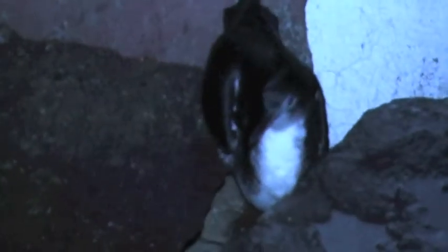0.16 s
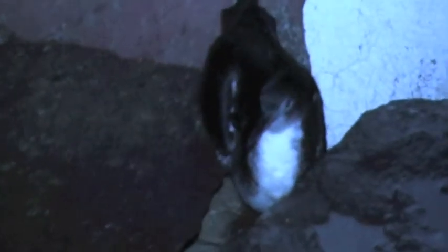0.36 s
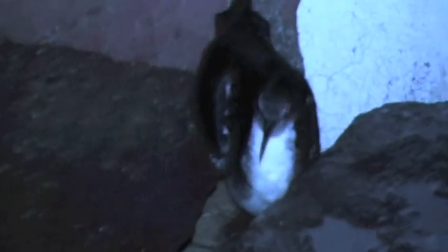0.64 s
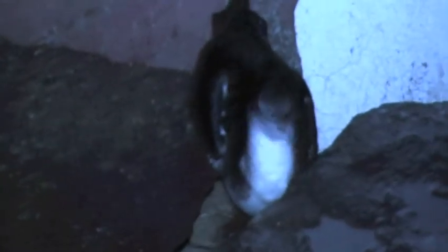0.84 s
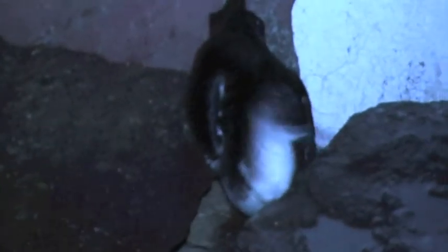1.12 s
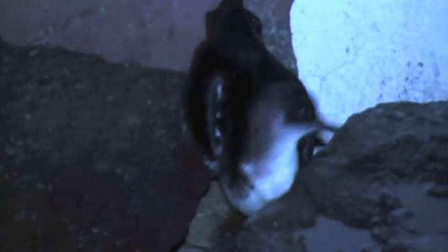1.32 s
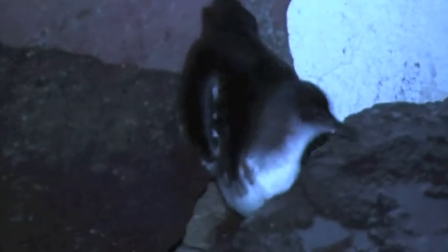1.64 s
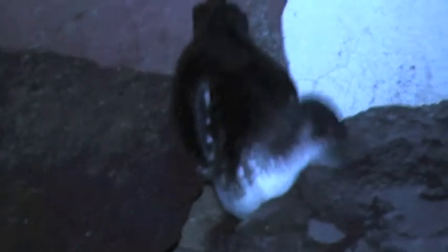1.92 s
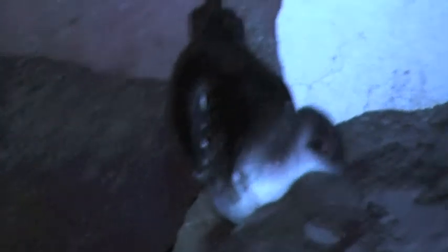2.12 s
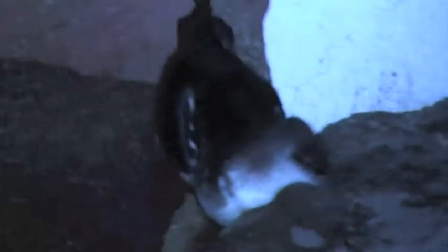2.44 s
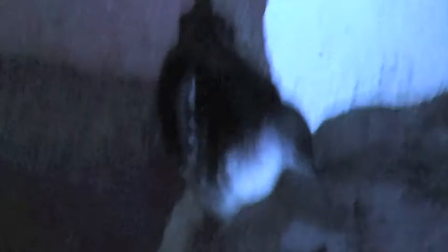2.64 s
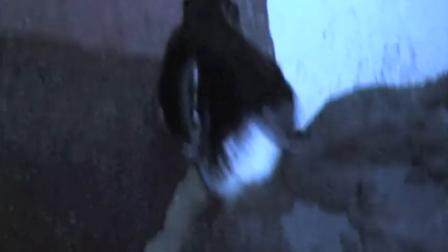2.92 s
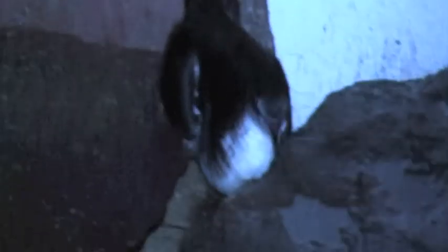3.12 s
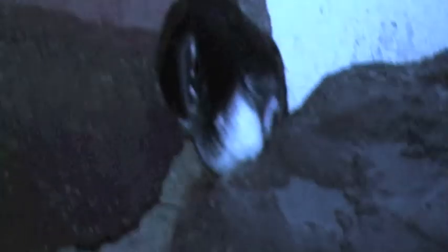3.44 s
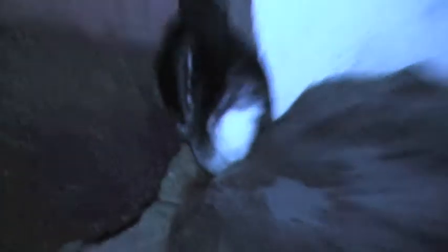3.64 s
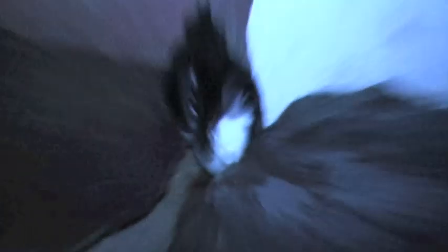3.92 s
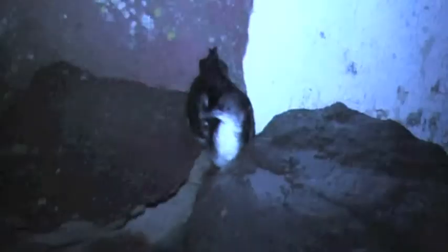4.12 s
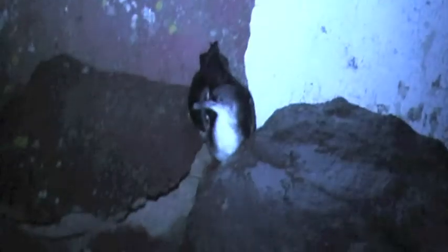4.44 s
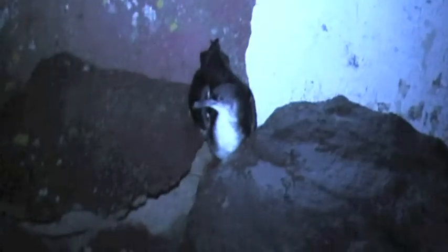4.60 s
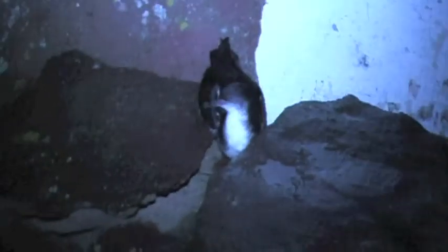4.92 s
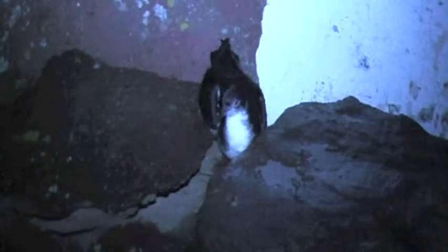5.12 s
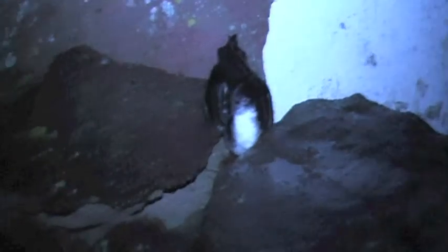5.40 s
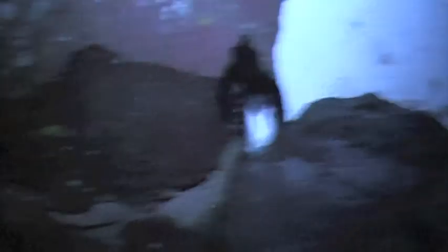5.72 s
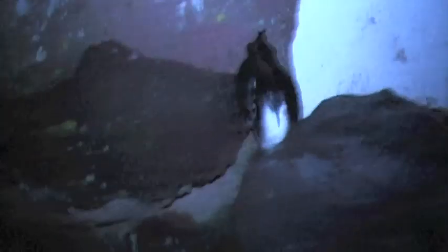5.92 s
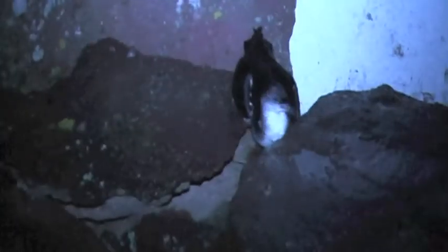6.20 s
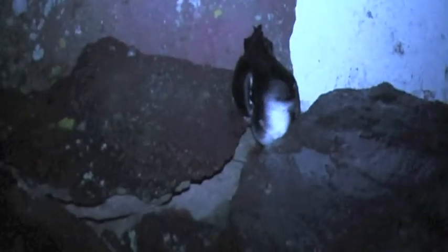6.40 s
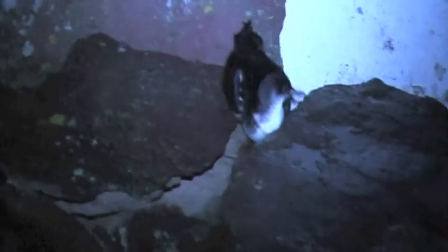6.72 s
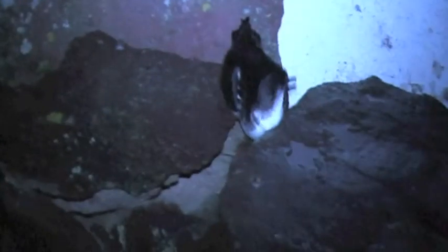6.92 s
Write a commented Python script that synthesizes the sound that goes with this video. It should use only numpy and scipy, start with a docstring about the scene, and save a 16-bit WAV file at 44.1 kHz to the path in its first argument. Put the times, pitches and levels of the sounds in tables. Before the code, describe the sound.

From a small rocky shelter at the edge of a nighttime colony, a crowd of far seabirds wails continuously, dotted with short whistles and yelps. One closer bird opens with three harsh rasps and a moan. Two hollow knocks follow near the microphone, then a sharp snap on the right, the loudest sound. More knocks, small ticks and faint rubbing come while the birds carry on.

```python
"""Hundreds of distant shearwaters wail together at night, heard from a rock shelter at the colony's edge.
A nearer bird rasps three times, ragged pulses ringing its throat, and trails off in a hoarse moan.
Single wails and thin peeps arch above the crowd; each voice is a membrane whose pitch jitters.
Close by come a few knocks and ticks, soft rubbing as of a handled camera, and one sharp snap,
the loudest sound: a catch strikes home and the casing rings."""
import sys
import numpy as np
from scipy import signal
from scipy.fft import rfft, irfft, next_fast_len
from scipy.io import wavfile

SR = 44100
rng = np.random.default_rng(int(sys.argv[2]) if len(sys.argv) > 2 else 0)


def transcribe(u):
    """Save the signal u as a 16-bit wav file named by the first command-line argument.

    u: samples, shape (n,) or (channels, n), limited to [-1, 1]; the rate is SR.
    q: integer samples, one column per channel.
    """
    v = np.clip(np.atleast_2d(u).T, -1, 1)
    q = np.round(v * 32767).astype(np.int16)
    wavfile.write(sys.argv[1], SR, q)


N = 311331

# rock shelter reverberation: freq_hz, t60_s
SHELTER_DECAY = [(200, 0.3), (2500, 0.077), (5000, 0.1), (12000, 0.016)]


def amp(db):
    """Decibels to gain."""
    return 10 ** (np.asarray(db) / 20)


def unit(x):
    """x at rms 1."""
    return x / np.sqrt(np.mean(x ** 2) + 1e-20)


def along(points, hz):
    """(freq_hz, value) points read on a log axis."""
    freqs_hz, values = np.transpose(points)
    return np.interp(np.log(hz + 1), np.log(freqs_hz), values)


def wobble(rate_hz, size=N):
    """Random curve with rate_hz knots a second."""
    knots = rng.standard_normal(int(size * rate_hz / SR) + 2)
    return np.interp(np.arange(size) * rate_hz / SR, np.arange(len(knots)), knots)


def gate(start_s, end_s, attack_s, release_s):
    """Exponential rise, hold from start_s to end_s, exponential decay."""
    t = np.arange(N) / SR
    return np.exp(-np.maximum(start_s - t, 0) / attack_s - np.maximum(t - end_s, 0) / release_s)


def elapsed(start_s, end_s):
    """Seconds since start_s, held from end_s."""
    return np.clip(np.arange(N) / SR, start_s, end_s) - start_s


def add(track, start_s, sound):
    """Mix a sound into a track."""
    start = max(round(start_s * SR), 0)
    part = track[..., start:start + sound.shape[-1]]
    part += sound[..., :part.shape[-1]]


def filtered(x, response):
    """x through a frequency response."""
    size = x.shape[-1]
    padded = next_fast_len(size + 4096, True)
    return irfft(rfft(x, padded) * response(np.fft.rfftfreq(padded, 1 / SR)), padded)[..., :size]


def coloured(x, spectrum):
    """x with a (freq_hz, gain_db) colour, at rms 1."""
    return unit(filtered(x, lambda hz: amp(along(spectrum, hz))))


def resonance(hz, centre_hz, width_hz):
    """Causal response of one resonance."""
    return 1j * hz * width_hz / (centre_hz ** 2 - hz ** 2 + 1j * hz * width_hz)


def band(x, centre_hz, width_hz):
    """x twice through one resonance, at rms 1."""
    return unit(filtered(x, lambda hz: resonance(hz, centre_hz, width_hz) ** 2))


def hump(hz, centre_hz, octaves):
    """Broad rounded peak with straight skirts."""
    return amp(-16 * np.hypot(np.log2((hz + 60) / centre_hz) / octaves, .6))


def spread(pair):
    """Two unrelated signals as mid and side of a wide field."""
    # stereo width: freq_hz, side_gain_db
    width = [(60, -1), (110, -5), (200, -0.5), (380, -5), (700, -9), (1290, -1.5), (2380, -4.5), (4400, -6),
             (8120, -0.5), (15000, -9)]
    side = filtered(pair[1], lambda hz: amp(along(width, hz)))
    return np.array([pair[0] + side, pair[0] - side])


def echoes(x):
    """The shelter's diffuse stereo tail; each frequency dies at its own rate."""
    hz, t, noise = signal.stft(rng.standard_normal((2, SR // 2)), SR, nperseg=256)
    decay = amp(-60 * t / along(SHELTER_DECAY, hz)[:, None])
    tail = signal.istft(noise * decay, SR, nperseg=256)[1]
    return signal.fftconvolve(x[None], tail / np.linalg.norm(tail[0]), axes=1)[:, :N]


def arch(length_s, rise, fall):
    """Relative pitch and loudness of a note that climbs quickly and sinks slowly."""
    progress = np.linspace(0, 1, int(length_s * SR))
    pitch = 1 - rise * np.exp(-progress / 0.0911) - fall * (progress - .3) ** 2
    return pitch, np.abs(np.sin(np.pi * progress)) ** 0.4


def syrinx(pitch_hz, rough, harmonics=6):
    """Vibrating membrane; period and level jitter more as the voice gets rough."""
    jitter = 0.136 * rough * wobble(350, len(pitch_hz))
    phase = 2 * np.pi * np.cumsum(pitch_hz * (1 + jitter)) / SR
    stack = sum(np.sin((k + 1) * phase.astype(np.float32)) for k in range(harmonics))
    return unit(stack * amp(5.3 * rough * wobble(220, len(pitch_hz))))


def contact(colour, t60_s, rattle=0.15, size=1024):
    """One blow: a push and a dying rattle of micro-contacts through a minimum-phase colour."""
    t = np.arange(size) / SR
    cepstrum = irfft(np.log(colour(np.fft.rfftfreq(size, 1 / SR)) + 1e-5))
    cepstrum[1:size // 2] *= 2
    cepstrum[size // 2 + 1:] = 0
    impulse_response = irfft(np.exp(rfft(cepstrum)))[:size // 2]
    force = (t == 0) + rattle * rng.standard_normal(size) * 1e-3 ** (t / t60_s)
    blow = np.convolve(impulse_response, force)
    return 3 * blow / np.linalg.norm(blow)


def ringing(modes, attack_s=0.0017):
    """Struck modes, each dying at its own rate."""
    t = np.arange(SR // 5) / SR
    ring = sum(amp(db) * 1e-3 ** (t / t60_s) * np.sin(2 * np.pi * (hz * t + rng.random()))
               for hz, db, t60_s in modes)
    return ring * (1 - np.exp(-t / attack_s))


def far_peeps(top_hz, rough, count):
    """Many short peeps at random moments, at rms 1."""
    out = np.zeros((2, N))
    for i, (when, long, high) in enumerate(rng.random((count, 3))):
        pitch, swell = arch(0.0319 + 0.0524 * long, rise=0.1014, fall=0.199)
        voice = syrinx(top_hz * (1 + .16 * (high - .5)) * pitch, rough, harmonics=1)
        add(out[i % 2], (i + when) / count * N / SR, swell * voice)
    return unit(out)


def night_air():
    """Steady wash of the sea and the farthest birds; high chirps merge into fluttering bouts."""
    # wash spectrum: freq_hz, gain_db
    wash_colour = [(25, -10), (50, -15), (85, -10.5), (125, -14.5), (180, -8.5), (240, -14), (440, -4.5),
                   (650, -5.5), (1100, -1), (2030, -18.5), (2800, -21.5), (3300, -22.5), (4450, -20.5),
                   (5300, -27.5), (7500, -32), (8800, -32.5), (11000, -36), (15800, -40.5)]
    # far twittering: middle_s, length_s, level_db
    twitter_bouts = [(.97, .25, -72), (1.541, 0.049, -69), (2.662, .32, -74), (2.944, 0.3, -69),
                     (3.62, 0.086, -62.5), (3.77, .11, -68), (4.0, 0.17, -73), (6.266, .26, -65),
                     (6.55, 0.11, -67), (6.88, .22, -68.5)]
    wash = amp(-52.0 + 0.35 * wobble(6.7)) * coloured(rng.standard_normal((2, N)), wash_colour)
    blur = band(rng.standard_normal((2, N)), 4220, 900)
    chirps = unit(blur + amp(1) * far_peeps(top_hz=4550, rough=0.257, count=380))
    swell = np.full(N, amp(-80))  # floor between bouts
    for middle_s, length_s, db in twitter_bouts:
        add(swell, middle_s - length_s / 2, amp(db) * signal.windows.tukey(int(length_s * SR), .8))
    twitter = swell * amp(2.5 * wobble(45)) * chirps
    return spread(wash + twitter + amp(-74.5) * far_peeps(top_hz=2670, rough=0.37, count=70))


def colony(count=340):
    """Far wavering wails, each with its own formant, dulled by distance; slopes smear part into a wash."""
    # swell and ebb: time_s, level_db
    levels = [(0.0, -46), (.1, -50.5), (0.19, -47.5), (0.77, -47), (0.92, -49.5), (1.34, -52), (2.0, -47),
              (2.54, -53.5), (3.17, -49.5), (4.23, -50), (4.36, -49.5), (5.54, -49.5), (5.7, -47.5),
              (6.07, -53), (6.43, -47.5), (6.8, -50.5), (7.06, -49)]
    # crowd spectrum: freq_hz, gain_db
    chorus = [(250, -16), (420, -11.5), (650, -7), (820, 0), (1050, 0), (1350, -2), (1700, -10),
              (2200, -14), (3000, -15.5), (5000, -90)]
    crowd = np.zeros((2, N + SR))
    for i, (when, long, high, loud, hoarse, vowel) in enumerate(rng.random((count, 6))):
        pitch, swell = arch(.05 + .15 * long, rise=.2, fall=.3)
        pitch_hz = 320 * 2 ** high * pitch * (1 + 0.0199 * wobble(60, len(pitch)))
        voice = syrinx(pitch_hz, rough=.15 + .45 * hoarse)
        voice = unit(filtered(voice, lambda hz: resonance(hz, 500 + 1300 * vowel, 1100)))
        add(crowd[i % 2], (i + when) / count * (N / SR + 1), amp(5 * loud) * swell * voice)
    voices = coloured(crowd[:, SR // 2:][:, :N], chorus)
    wash = 0.52 * coloured(rng.standard_normal((2, N)), chorus)
    level_db = np.interp(np.arange(N) / SR, *np.transpose(levels)) - 2.5
    return amp(level_db) * spread(voices + wash)


def wails():
    """Single birds wail in an arch through one formant; some carry a strong fundamental."""
    # wails: start_s, length_s, top_hz, level_db, formant_hz, roughness, fundamental_db, fall_ratio
    calls = [(.88, 0.053, 432, -54, 1300, 0.2, -22, 0.11), (1.005, .04, 371, -48, 1150, 0.1, -22, .2),
             (1.065, 0.11, 350.3, -50, 1030, 0, -18, 0.16), (1.345, 0.063, 413.5, -52.5, 910, 0, -18, 0.15),
             (1.92, .08, 462, -51.5, 1380, .12, -29, 0.11), (1.98, 0.062, 500, -56, 1400, 0.53, -24, .2),
             (2.075, 0.065, 505, -51, 1400, 0.57, -19, 0.23), (2.89, 0.043, 550, -55.5, 1640, .15, -25, .2),
             (3.145, 0.059, 358, -48.5, 1030, 0, -23, 0.28), (3.44, 0.042, 502, -59, 1010, .1, 8, 0.27),
             (3.63, .05, 440, -56, 1290, 0.2, -22, 0.27), (3.712, 0.082, 467, -50.5, 1300, 0.2, -25, 0.42),
             (3.71, 0.088, 365, -53, 1080, 0, -24, .3), (3.88, 0.064, 390, -49, 1120, 0.3, -22, 0.24),
             (4.2, .24, 430, -57, 1280, .04, -20, 0.028), (5.31, 0.15, 582, -58.5, 1770, 0.14, -26, .03),
             (5.44, 0.098, 617, -62, 1870, .12, -24, 0.043), (5.845, 0.038, 359, -53, 1080, .05, -22, .3),
             (6.185, 0.051, 358, -48.5, 1110, 0.08, -24, 0.28),
             (6.215, 0.2, 470.7, -51, 940, 0.05, -9, 0.075), (6.6, 0.055, 481, -55, 1500, 0.04, -22, 0.33),
             (6.692, 0.072, 428, -52, 1200, 0.04, 1.5, 0.36),
             (6.75, 0.026, 359, -47, 1050, 0.06, -20, 0.29),
             (6.86, .075, 325.5, -47, 930, 0.13, -18, 0.075),
             (6.93, 0.13, 375, -51.5, 1070, 0.14, -27, 0.068)]
    out = np.zeros(N)
    for start_s, length_s, top_hz, db, formant_hz, rough, fundamental_db, fall in calls:
        pitch, swell = arch(length_s, rise=0.139, fall=fall)
        voice = band(syrinx(top_hz * pitch, rough), formant_hz, width_hz=234)
        fundamental = amp(fundamental_db) * syrinx(top_hz * pitch, rough, harmonics=1)
        add(out, start_s, amp(db) * swell * (voice + fundamental))
    return out


def peeps():
    """Whistles from clear to hoarse, each a small arch of pitch with a quavering start."""
    # peeps and yelps: start_s, length_s, top_hz, level_db, rise_ratio, roughness
    calls = [(.034, 0.069, 3010, -61, 0.075, 0), (.19, 0.035, 3600, -59, .05, 0.1),
             (.41, 0.093, 3160, -67, .1, .05), (.8, 0.081, 3050, -62.5, 0.15, 0),
             (1.074, 0.047, 2130, -54, 0.13, 0.17), (1.17, .08, 2900, -66, .2, 0.2),
             (1.265, 0.052, 2000, -58, .05, .3), (1.62, 0.066, 2950, -62, 0.12, 0.06),
             (1.632, .052, 2080, -48, 0.053, 0.03), (1.745, 0.053, 2500, -59, .15, 0.4),
             (1.803, 0.033, 2870, -61.5, 0.072, .08), (2.32, .04, 2480, -67, .08, 0.4),
             (2.35, 0.086, 2870, -63, 0.14, .15), (2.52, .08, 4520, -67, .04, .1),
             (2.545, .045, 2900, -66, .08, .12), (2.694, .078, 2980, -56, .2, 0.14),
             (2.71, 0.063, 2720, -59, 0.11, 0.36), (2.893, .09, 4530, -64.5, 0.031, 0.13),
             (2.975, 0.076, 4570, -70, .05, 0.1), (3.051, .092, 2970, -56.5, .13, .03),
             (3.06, .06, 4400, -75, .04, 0.17), (3.495, 0.1, 2940, -58.5, 0.093, 0),
             (3.598, 0.035, 1660, -50, 0.21, 0), (3.96, 0.072, 2920, -62, 0.084, 0.02),
             (4.135, 0.094, 4260, -64, 0.037, .08), (4.147, 0.028, 2830, -57, 0.11, 0),
             (4.208, 0.12, 3090, -57, 0.14, 0.13), (4.395, .088, 2880, -60.5, 0.089, 0),
             (4.66, 0.033, 1680, -48, 0.13, 0.14), (4.7, 0.031, 2820, -51.5, 0.091, .1),
             (4.762, 0.095, 3110, -56, .14, 0.13), (4.82, .075, 2880, -53, 0.024, .2),
             (5.265, 0.046, 2030, -55, .1, 0.03), (5.294, 0.069, 2870, -51, 0.065, 0),
             (5.33, 0.11, 3090, -65, .08, 0), (5.541, 0.041, 2150, -53, .22, 0.2),
             (5.69, 0.04, 1880, -56, .08, 0.26), (5.715, .06, 2450, -60, .1, 0.17),
             (5.755, 0.081, 2040, -59.5, 0.075, 0.06), (5.783, 0.093, 3170, -63, .17, 0.03),
             (5.868, 0.086, 3120, -59.5, .17, 0), (6.008, 0.053, 4330, -59.5, 0.046, 0.1),
             (6.03, 0.04, 1115, -43, .1, 0.1), (6.22, 0.078, 2900, -58, 0.063, .1),
             (6.645, 0.07, 2930, -55, 0.15, .06), (6.66, .25, 5080, -71, .03, 0),
             (6.83, 0.057, 2870, -58, 0.11, 0.3)]
    out = np.zeros(N)
    for start_s, length_s, top_hz, db, rise, rough in calls:
        pitch, swell = arch(length_s, rise, fall=.25)
        t = np.arange(len(pitch)) / SR
        quaver = (0.18 * rough + .04 * np.exp(-t / .01)) * wobble(700, len(t))
        note = np.sin(2 * np.pi * np.cumsum(top_hz * pitch * (1 + quaver)) / SR)
        flutter_db = 2 * wobble(210, len(t))
        add(out, start_s, amp(db + flutter_db) * np.sqrt(swell) * note)
    return out


def throat_rasp(pulse_hz=210, jitter=0.23, leak=0.61):
    """Ragged puffs of air, with a leak between them, ring the throat."""
    # throat resonances: centre_hz, width_hz, gain_db
    formants = [(1713, 98, 4.5), (1870, 130, 2), (2270, 570, -6.5), (2640, 160, -7)]

    def throat(hz):
        """Formants of alternating sign within one broad band."""
        peaks = sum((-1) ** k * amp(db) * resonance(hz, centre_hz, width_hz)
                    for k, (centre_hz, width_hz, db) in enumerate(formants))
        return peaks * resonance(hz, 1800, 1100) ** 2

    cycles = np.cumsum(pulse_hz * (1 + jitter * wobble(200))) / SR
    puffs = rng.standard_normal(N) * (leak + np.exp(-(cycles % 1) / .2))
    edge = amp(-27.5) * band(puffs, 5200, 1400)
    chest = amp(-13.5) * band(puffs, 970, 700)
    return unit(filtered(puffs, throat)) + edge + chest


def near_bird():
    """Three rasps trail off in wheezes; a hoarse moan sounds under the second and after the third."""
    # rasps, the second in two parts: start_s, hold_s, level_db, tilt_db_per_octave
    rasps = [(0.155, .018, -38, 1.5), (.338, 0.035, -43, -6), (0.407, .006, -46, -14),
             (0.535, .013, -42.5, -9)]
    # moans: start_s, end_s, first_hz, last_hz, level_db
    moans = [(0.294, 0.398, 365, 416, -50.5), (0.582, 0.9, 420, 365.1, -45.5)]
    # mouth response: freq_hz, gain_db
    mouth = [(370, -36), (600, -13), (760, 1), (900, -13), (1100, -1.5), (1480, 4), (1800, -3), (2200, -47),
             (4000, -55)]
    attack_s, glide_s, fade_db_per_s = 0.011, .085, 14
    rasp = throat_rasp()
    out = np.zeros(N)
    for start_s, hold_s, db, tilt in rasps:
        burst = gate(start_s, start_s + hold_s, attack_s, release_s=0.016)
        wheeze = amp(-13) * gate(start_s, start_s + hold_s, attack_s, release_s=0.13)
        tilted = filtered(rasp, lambda hz: amp(tilt * np.log2(np.clip(hz / 1800, 1, 2))))
        out += amp(db) * (burst + wheeze) * tilted
    for start_s, end_s, first_hz, last_hz, db in moans:
        age_s = elapsed(start_s, end_s)
        glide_hz = last_hz + (first_hz - last_hz) * np.exp(-age_s / glide_s)
        pitch_hz = glide_hz * (1 + 0.0122 * wobble(30.38))
        swell = amp(db - fade_db_per_s * age_s) * gate(start_s, end_s, attack_s, release_s=0.055)
        voice = coloured(syrinx(pitch_hz, rough=0.12) + syrinx(pitch_hz, rough=0.92), mouth)
        out += swell * (voice + amp(-27) * rasp)
    return out


def rubbing():
    """Fibres slip in a grainy hiss with narrow scrapes, left of centre, and drum faintly on the casing."""
    # fibre hiss: freq_hz, gain_db
    cloth = [(1200, 6.5), (2400, 7), (4200, 1.5), (6500, -3), (8500, -6), (11000, -6.5), (12500, -9),
             (14000, -7), (16000, -8)]
    # strokes: start_s, end_s, level_db
    strokes = [(5.028, 5.175, -56), (6.052, 6.274, -53), (6.445, 6.542, -57.5)]
    # narrow scrapes: start_s, end_s, centre_hz, level_db
    scrapes = [(5.087, 5.196, 9850, -59), (6.03, 6.287, 12200, -60), (6.04, 6.19, 8400, -59.5)]
    # shading of the right side: freq_hz, gain_db
    shadow = [(200, -7.5), (700, 0), (2000, -5.5), (4400, -2), (8000, -3), (11000, -6), (14000, -11)]
    drum_colour = [(25, -31), (70, 5), (300, -4), (900, -35), (3000, -70)]  # freq_hz, gain_db
    swell_db_per_s = 9  # pressure grows along a stroke
    hiss = coloured(rng.standard_normal((2, N)) * amp(wobble(800)), cloth)
    drumming = amp(-11.5) * coloured(rng.standard_normal((2, N)), drum_colour)
    pressure = np.zeros(N)
    for start_s, end_s, db in strokes:
        swell = amp(db + swell_db_per_s * elapsed(start_s, end_s))
        pressure += swell * gate(start_s, end_s, attack_s=0.019, release_s=0.025)
    rub = (hiss + drumming) * pressure
    for start_s, end_s, centre_hz, db in scrapes:
        size = int((end_s - start_s) * SR)
        scrape = band(rng.standard_normal((2, size)), centre_hz, width_hz=1600)
        add(rub, start_s, amp(db) * signal.windows.tukey(size, .5) * scrape)
    mid, side = rub[0], amp(-4.5) * rub[1]
    return np.array([mid + side, filtered(mid - side, lambda hz: amp(along(shadow, hz)))])


def ticks():
    """Light contacts, each centred on its own pitch, with a scatter of fainter ones."""
    # clear ticks: start_s, level_db, centre_hz
    clear = [(2.48, -47, 7000), (3.356, -40, 4660), (3.411, -38.5, 6170), (3.795, -49, 8000),
             (4.875, -35, 4400), (4.9076, -43, 9000), (4.9492, -33.5, 6300), (4.973, -39, 3780),
             (5.307, -46.5, 6300), (5.415, -44.5, 6360), (5.5693, -40, 7000), (6.3115, -43, 3980),
             (6.3498, -44, 3480), (6.689, -38.5, 9800)]
    faint = [(start_s, -49, 7000) for start_s in rng.uniform(4.7, 5.5, 5)]
    out = np.zeros(N)
    for start_s, db, centre_hz in clear + faint:
        add(out, start_s, amp(db) * contact(lambda hz: hump(hz, centre_hz, octaves=1.6), t60_s=.011))
    return out + amp(-7) * echoes(out)


def knocks():
    """A hollow body tone with a thud below it, a thin crack and a brief ring on top."""
    # dull knocks: start_s, level_db, centre_hz, thud_db, crack_db, ring_db
    blows = [(1.9142, -25.5, 1280, -0.5, 0.5, -14.5), (3.2544, -22, 1320, 1.5, -33, -22),
             (4.8153, -20.5, 2210, 0, -28, -23), (5.139, -32, 2700, 2, -6, -21),
             (6.322, -37, 2200, 3, -19, -22), (6.329, -35.5, 2420, 8, -17, -19)]
    # ring modes: freq_hz, level_db, t60_s
    modes = [(2650, 1, 0.028), (3340, -3.5, 0.036), (3596, -8, 0.039)]
    # thud spectrum: freq_hz, gain_db
    thud_colour = [(60, -27), (300, -9.5), (600, -1.5), (1100, 2.5), (1500, 0.5), (2500, -15), (8000, -77)]
    # crack spectrum: freq_hz, gain_db
    crack_colour = [(500, -25), (2400, -8), (3350, 3), (4200, -15), (5600, 0.5), (6500, -15), (8200, -19),
                    (8900, -4), (10500, -6), (15000, -11)]
    out = np.zeros(N)
    for start_s, db, centre_hz, thud_db, crack_db, ring_db in blows:
        add(out, start_s, amp(db + ring_db) * ringing(modes))
        body = contact(lambda hz: hump(hz, centre_hz, octaves=0.85), t60_s=0.028, rattle=0.12)
        thud = contact(lambda hz: amp(along(thud_colour, hz)), t60_s=0.02, rattle=0.078)
        crack = contact(lambda hz: amp(along(crack_colour, hz)), t60_s=0.0082)
        add(out, start_s, amp(db) * (body + amp(thud_db) * thud + amp(crack_db) * crack))
    return out + amp(-11) * echoes(out)


def snap():
    """A catch lets go and strikes home within milliseconds, on the right; the casing rings and rocks."""
    # contacts of the catch: start_s, level_db, tilt_db_per_octave
    contacts = [(4.2741, -12, 0), (4.2787, -0.5, 5), (4.281, -4.5, 0), (4.2858, -18, -5.5)]
    # contact spectrum: freq_hz, gain_db
    catch_colour = [(60, -16), (330, -23.5), (600, -11), (900, -13), (1400, -7), (1900, -8.5), (2650, 0),
                    (3200, -1), (3900, -1), (4500, -3), (5400, -13), (6600, -16), (10500, -25.5),
                    (13000, -29), (15800, -31)]
    # casing modes: freq_hz, level_db, t60_s
    casing = [(1220, -3, 0.057), (2337, 16, 0.022), (2500, 4, 0.04), (2810, 4, 0.063), (3260, -10, 0.064),
              (3610, 3.5, 0.05), (4410, 0, 0.052), (4100, 2, 0.04), (4880, -2, 0.074), (5360, -17, 0.06),
              (6260, -18, 0.034), (7140, -21, .045), (10140, -8, 0.058)]
    # jolt at each microphone port: freq_hz, gain_db
    port_colour = [(30, -42), (100, -14), (250, -6), (600, -5), (1500, 5), (4000, 8.5), (8000, -7),
                   (16000, -7)]
    # side-to-side modes of the body: freq_hz, level_db, t60_s
    rocking = [(175, -17, .06), (430, 0, .04), (540, 1, .035)]
    # shading of the left side: freq_hz, gain_db
    shadow = [(60, -1), (380, -12), (700, 1.5), (1290, -14.5), (2400, -7), (4400, -11.5), (8100, -8.5),
              (14000, -4)]
    strike_s, jolt_t60_s = contacts[1][0], 0.052
    right, ports = np.zeros(N), np.zeros((2, N))
    for start_s, db, tilt in contacts:
        colour = lambda hz: amp(along(catch_colour, hz) + tilt * np.log2((hz + 500) / 3000))
        add(right, start_s, amp(db + 5.5) * contact(colour, t60_s=0.0082))
    add(right, strike_s, amp(-26) * ringing(casing))
    t = np.arange(SR // 5) / SR
    jolt = coloured(rng.standard_normal((2, len(t))), port_colour)
    add(ports, strike_s, amp(-22 - 60 * t / jolt_t60_s) * jolt)
    rock = ringing(rocking, attack_s=0.0027)
    add(ports, strike_s + .003, amp(-17) * np.array([rock, -rock]))
    left = filtered(right, lambda hz: amp(along(shadow, hz)))
    return np.array([left, right]) + ports + amp(-22) * echoes(right)


def scene():
    """Birds outside, small handling sounds inside the shelter."""
    near, calls = near_bird(), peeps() + wails()
    near = near * amp([[1], [-3]]) + amp(-8) * echoes(near)  # left of centre
    calls = calls + amp(-12) * echoes(calls)
    return night_air() + colony() + calls + near + rubbing() + ticks() + knocks() + snap()


def record(dry):
    """The camera rounds off the highest peaks, thins the deep bass and cuts the top treble."""
    ceiling, low_cut_hz, top_hz = .64, 45, 15850
    rounded = dry / (1 + (dry / ceiling) ** 4) ** .25
    thinned = signal.sosfilt(signal.butter(2, low_cut_hz, "high", fs=SR, output="sos"), rounded)
    return filtered(thinned, lambda hz: 1 / (1 + (hz / top_hz) ** 160))


dry = scene()
out = record(dry)
transcribe(out)
```